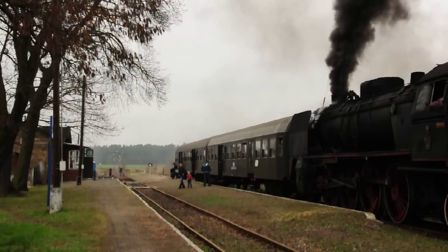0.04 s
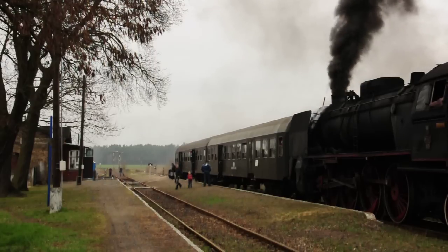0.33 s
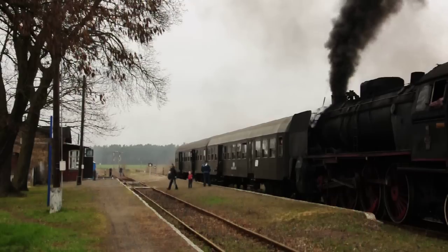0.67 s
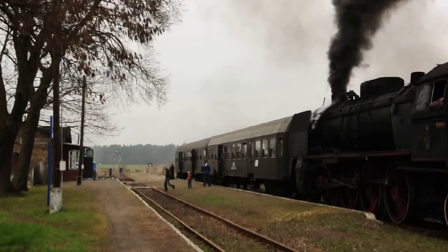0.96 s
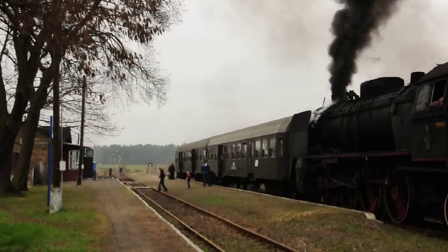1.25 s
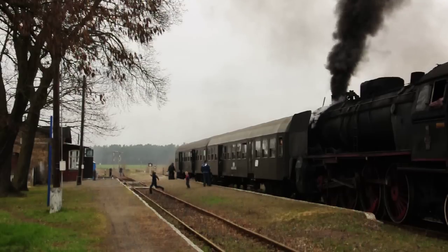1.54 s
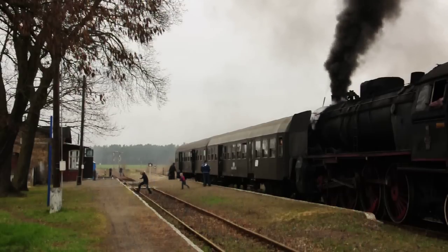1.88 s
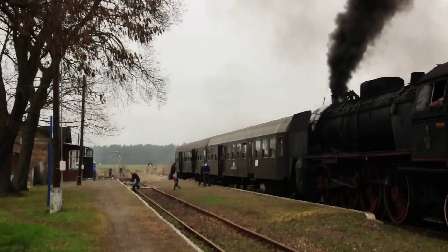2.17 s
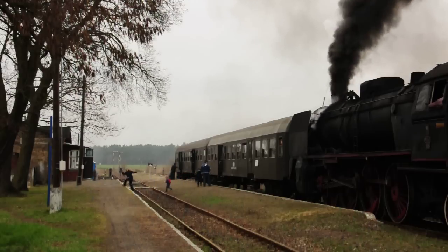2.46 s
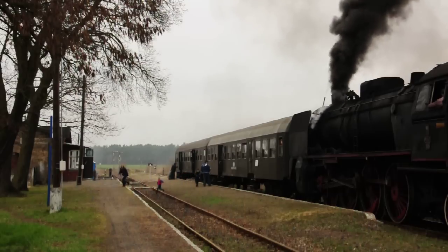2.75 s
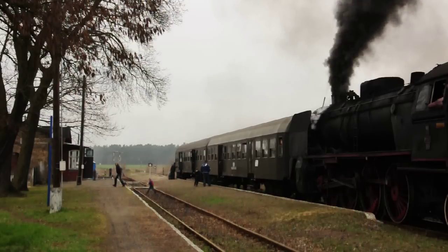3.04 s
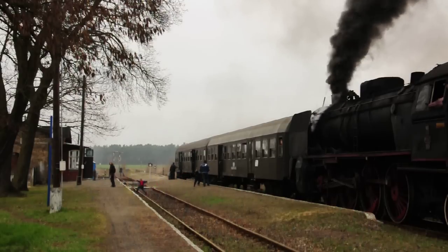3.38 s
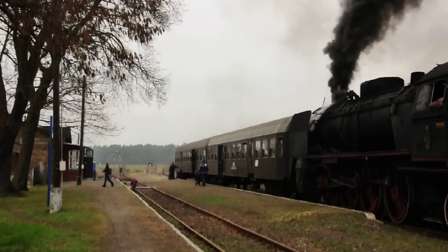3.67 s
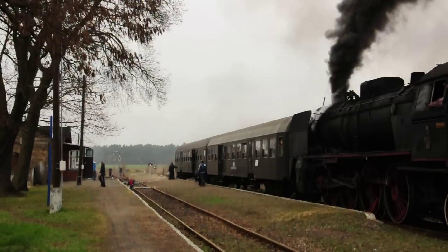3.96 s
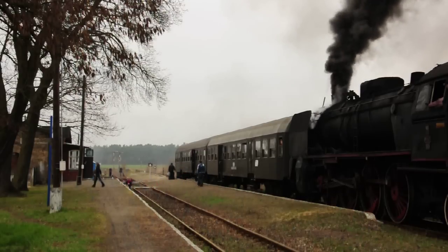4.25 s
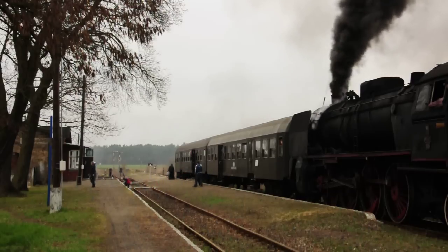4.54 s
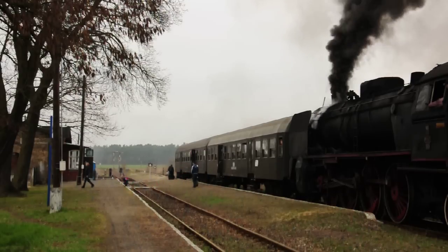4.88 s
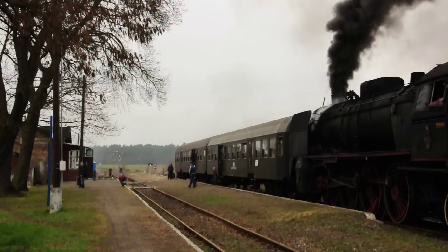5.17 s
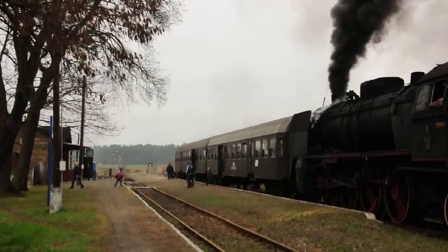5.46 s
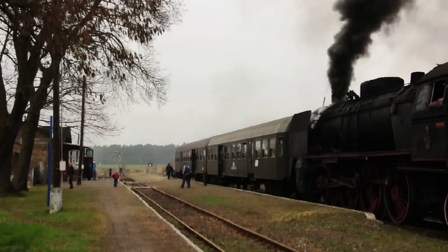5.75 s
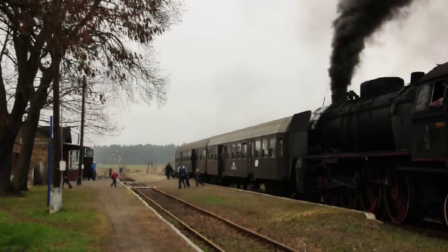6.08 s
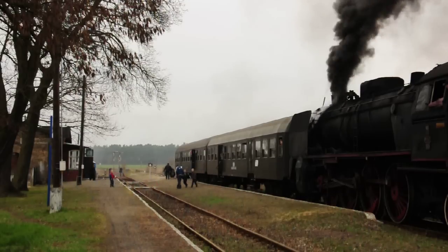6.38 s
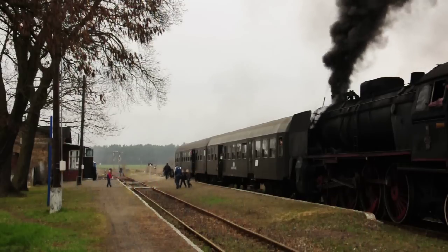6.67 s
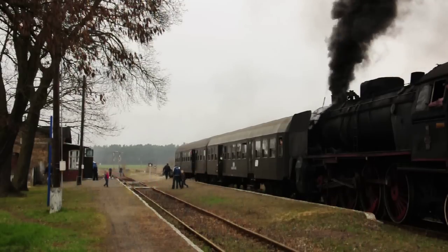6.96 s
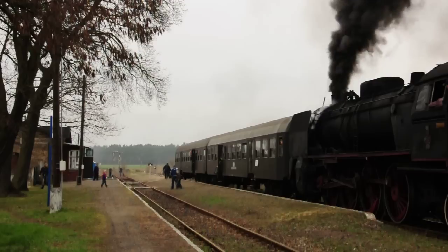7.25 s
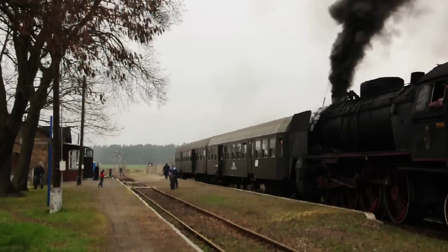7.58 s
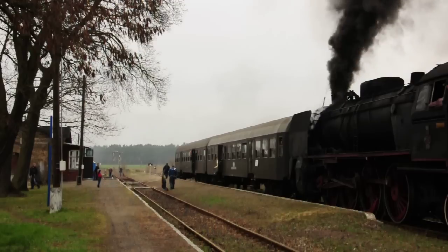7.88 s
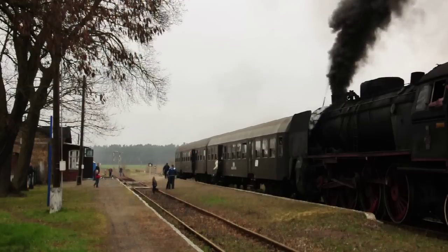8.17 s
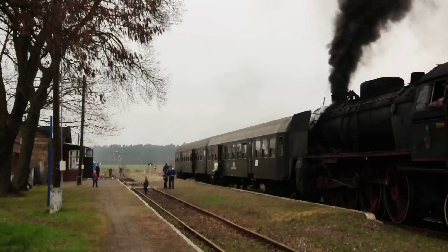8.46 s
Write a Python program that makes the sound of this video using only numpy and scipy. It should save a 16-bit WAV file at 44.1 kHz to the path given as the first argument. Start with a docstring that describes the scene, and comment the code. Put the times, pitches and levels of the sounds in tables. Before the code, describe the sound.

Sharp, spitting bursts of steam repeat in a limping rhythm from a waiting steam locomotive, above constant hiss and faint rumble.

```python
"""A steam locomotive stands at a country station, its blower hissing up the chimney over a rumbling fire.
From the start its air pump works in a limping two-stroke beat: each stroke dumps its steam in a sharp
crack, then a fading chuff that spits condensate. Just before 4 s, one iron clank sounds from the engine,
and the pump beats on to the end. All is heard through a small mono microphone that briefly overloads
on the first peaks of a chuff and ducks its gain at every stroke."""
import sys
import numpy as np
from scipy import signal
from scipy.fft import rfft, irfft, next_fast_len
from scipy.io import wavfile

SR = 44100
rng = np.random.default_rng(int(sys.argv[2]) if len(sys.argv) > 2 else 0)


def persist_wave(psi):
    """Save psi, clipped to +-1, as 16-bit WAV."""
    counts = np.round(np.clip(psi, -1, 1) * 32767).astype(np.int16)
    wavfile.write(sys.argv[1], SR, np.atleast_2d(counts).T)


N = 375732
TIME = np.arange(N) / SR
MIC_BAND_HZ = 6250

# The pump's limping beat, a cycle about every 1.2 s. Each row: down stroke, up stroke, both in seconds.
PUMP_BEAT = [(.477, 1.024), (1.668, 2.214), (2.868, 3.433), (4.088, 4.637), (5.283, 5.843), (6.494, 7.037),
             (7.693, 8.249)]
# Tone of the steam's crack, its chuff and the low thump. Each row: frequency in Hz, relative level in dB.
CRACK_TONE = [(40, -25.5), (110, -7.5), (200, -15.5), (400, -10.5), (800, -12.5), (1400, -5), (2300, -4.5),
              (3200, 2), (5500, -1.5)]
CHUFF_TONE = [(50, -30.5), (150, -31.5), (300, -11.5), (600, -5), (1000, 1), (1600, 3), (2500, 4.5),
              (4000, 5.5), (5500, -3.5)]
THUMP_TONE = [(25, -11), (70, -8.5), (140, 9), (300, -5.5), (700, -23.5)]
# The exhaust pipe's resonances and notches. Each row: centre in Hz, width in Hz, boost or cut in dB.
EXHAUST_PIPE = [(161.7, 30, 4.5), (423, 110, 8.5), (639, 130, -2), (740, 52, 7), (841, 100, 8),
                (1117, 130, -4.5), (1430, 320, 4.5), (1767, 150, -2), (2050, 64, 3), (2330, 52, -2.5),
                (3010, 230, 2), (3240, 280, -2.5), (4930, 950, 6)]

def air_pump(crack_db=-2.5, spit_db=7.0, thump_db=-36.5, thump_s=0.0035, lead_in_cycle_s=1.23):
    """The valve opens on a full cylinder: a crack as the jet starts, a sinking hiss as it empties."""
    downs, ups = np.transpose(PUMP_BEAT)
    ups = np.append(ups[0] - lead_in_cycle_s, ups)  # already at work: one up stroke is still fading
    # the port uncovers slowly on the down stroke and snaps open on the up stroke
    down = sum(stroke_envelopes(s, jet_db=-10.0, open_s=.013, crack_s=.018, empty_s=.165) for s in downs)
    up = sum(stroke_envelopes(s, jet_db=-9.8, open_s=.0065, crack_s=.019, empty_s=.159) for s in ups)
    crack_envelope, chuff_envelope = down + up
    crack = from_db(crack_db) * crack_envelope * duct(turbulence(CRACK_TONE), EXHAUST_PIPE)
    chuff = chuff_envelope * duct(turbulence(CHUFF_TONE), EXHAUST_PIPE)
    spits = from_db(spit_db) * chuff_envelope * condensate()
    # the first outflow shoves the air: a small low thump
    shove = sum((TIME > s) * np.exp(-np.abs(TIME - s) / thump_s) for s in (*downs, *ups))
    thump = from_db(thump_db) * shove * turbulence(THUMP_TONE)
    return crack + chuff + spits + thump


def stroke_envelopes(start_s, jet_db, open_s, crack_s, empty_s, hold_shape=1.7):
    """The port opens: the crack dies fast, while the chuff's pressure holds a moment and runs out."""
    age = np.maximum(TIME - start_s, 0)
    flow = from_db(jet_db) * np.minimum(age / open_s, 1) ** 1.15
    crack = flow * np.exp(-np.maximum(age - open_s, 0) / crack_s)
    chuff = flow * np.exp(-(age / empty_s) ** hold_shape)  # a shape of 1 is a plain leak
    return np.array([crack, chuff])


def condensate(drops_per_s=36):
    """Drops in the wet steam spit in the jet: sparse, sharp ticks of uneven size."""
    ticks = (rng.random(N) < drops_per_s / SR) * rng.standard_normal(N)
    return signal.lfilter([1, 1, 0, -1, -1], 1, ticks)  # thins the bass and softens the very top


# The iron's hit and its rebounds. Each row: start in seconds, level in dB.
IRON_HITS = [(3.8547, -16.2), (3.8572, -22.5), (3.8640, -29)]
# The iron's ringing modes. Each row: pitch in Hz, level in dB, seconds to fall by 60 dB.
IRON_MODES = [(109, -22.5, 0.28), (144.4, -23, 0.45), (524, -29, .04), (1120, -16, .02), (2005, -5, .012),
              (2510, -2, .014), (2770, -10, .012)]
# Tone of the scraping contact. Each row: frequency in Hz, relative level in dB.
SCRAPE_TONE = [(200, -5.5), (700, -12), (1200, 1.5), (1700, -10), (2500, 5.5), (3300, -5), (5500, -10)]

def iron_clank(scrape_db=-3.0, scrape_s=0.0076):
    """Iron drops on iron, rings, scrapes for an instant and settles."""
    clicks, contact = np.zeros(N), np.zeros(N)
    for start, db in IRON_HITS:
        clicks[int(start * SR)] = from_db(db)
        contact += from_db(db) * (TIME >= start) * np.exp(-np.abs(TIME - start) / scrape_s)
    body = sum(from_db(db) * ring(clicks, hz, t60) * (-1) ** k  # modes alternate in polarity
               for k, (hz, db, t60) in enumerate(IRON_MODES))
    return body + from_db(scrape_db) * contact * turbulence(SCRAPE_TONE)


# Tone of the blower's jet. Each row: frequency in Hz, relative level in dB.
BLOWER_TONE = [(60, -36), (150, -11), (250, -11.5), (330, 0.5), (600, -0.5), (1000, 4.5), (1600, 1.5),
               (2500, 3.5), (3300, 2), (4200, -0.1), (5500, -8)]
# Smokebox and chimney resonances and notches. Each row: centre in Hz, width in Hz, boost or cut in dB.
CHIMNEY_PIPE = [(161, 70, 12), (349.6, 45, 2), (450, 230, 7), (660, 38, -6.5), (758, 75, 8.5),
                (900, 160, 4), (1520, 43, 8), (1654, 270, 5), (1840, 40, -3.5), (1990, 110, 2),
                (5050, 1700, 10.5)]

def blower(hiss_db=-28.5, note_hz=794.5, note_db=-43, swell_db=4):
    """A steady jet hisses up the chimney, whose main note swells and fades in the draught."""
    hiss = from_db(hiss_db) * duct(turbulence(BLOWER_TONE), CHIMNEY_PIPE)
    swell = from_db(note_db + swell_db * drift(rate_hz=5))
    note = unit_rms(ring(turbulence(BLOWER_TONE), note_hz, t60=0.07))
    return hiss + swell * note


# Tone of the fire's rumble. Each row: frequency in Hz, relative level in dB.
FIRE_TONE = [(20, -36), (40, -19.5), (55, 1.5), (68, -4), (85, -8.5), (115, -0.5), (140, -1), (170, -.5),
             (230, -5.5), (400, -5), (1000, -29)]

def fire(level_db=-48.5, flicker_db=0.8):
    """Air drawn through the fire makes a low, gently flickering rumble."""
    return from_db(level_db + flicker_db * drift(rate_hz=3.1)) * turbulence(FIRE_TONE)


# Slaps off the boiler side, the coaches and the station house. Each row: delay in seconds, level in dB.
STATION_ECHOES = [(.011, -21), (.047, -22), (.081, -24)]

def outdoors(x):
    """Nearby surfaces add a few faint echoes in the open air."""
    return x + sum(from_db(db) * np.interp(TIME - s, TIME, x, left=0) for s, db in STATION_ECHOES)


def turbulence(tone):
    """Noise shaped to a tone curve within the microphone's band, at rms 1."""
    hz, db = np.transpose(tone)
    size = next_fast_len(N, real=True)
    bin_hz = np.maximum(np.arange(size // 2 + 1) * SR / size, 1)
    gain = from_db(np.interp(np.log(bin_hz), np.log(hz), db)) * (bin_hz < MIC_BAND_HZ)
    return unit_rms(irfft(rfft(rng.standard_normal(size)) * gain, size)[:N])


def duct(jet, peaks):
    """A duct colours the jet leaving through it, one bell filter per resonance or notch; rms 1."""
    for hz, width_hz, db in peaks:
        gain, width = from_db(db / 2), np.pi * width_hz / SR
        tuning = -2 * np.cos(2 * np.pi * hz / SR)
        jet = signal.lfilter([1 + width * gain, tuning, 1 - width * gain],
                             [1 + width / gain, tuning, 1 - width / gain], jet)
    return unit_rms(jet)


def ring(drive, hz, t60):
    """One mode: a unit click starts a sine of height 1 that falls 60 dB in t60 seconds."""
    decay, angle = from_db(-60 / (t60 * SR)), 2 * np.pi * hz / SR
    return signal.lfilter([0, np.sin(angle)], [1, -2 * decay * np.cos(angle), decay ** 2], drive + 1e-18)


def drift(rate_hz):
    """Slow random wander at rms 1."""
    lag_s = 1 / (2 * np.pi * rate_hz)
    return unit_rms(smooth(smooth(rng.standard_normal(N + SR), lag_s), lag_s)[SR:])


def smooth(x, seconds):
    """One-pole lag."""
    pole = np.exp(-1 / (seconds * SR))
    return signal.lfilter([1 - pole], [1, -pole], x)


def from_db(db):
    """Decibels to gain."""
    return 10 ** (np.asarray(db) / 20)


def unit_rms(x):
    """Scale to rms 1."""
    return x / np.sqrt(np.mean(x ** 2) + 1e-20)


def scene():
    """Pump and clank with their echoes, over a bed of blower and fire, from one spot beside the track."""
    mono = outdoors(air_pump() + iron_clank()) + blower() + fire()
    return np.array([mono, mono])


def gain_control(x, threshold_db=-20.0, slope=.58, attack_s=.02, release_db_per_s=25.0):
    """Loud sound pulls the gain down after its first instant; the gain then creeps back."""
    level_db = 10 * np.log10(smooth(x[0] ** 2, .005) + 1e-12)
    duck_db = slope * np.maximum(level_db - threshold_db, 0)
    recovery_db = release_db_per_s * TIME
    held_db = np.maximum.accumulate(duck_db + recovery_db) - recovery_db
    return x * from_db(-smooth(held_db, attack_s))


def record(dry, knee=0.74, soft_edge_hz=5450, ceiling_hz=15800):
    """A small microphone: a narrow band, ducking gain, and overload that spits treble on the peaks."""
    x = signal.sosfilt(signal.butter(14, soft_edge_hz, fs=SR, output="sos"), dry)
    x = signal.sosfilt(signal.ellip(8, .2, 80, MIC_BAND_HZ - 300, fs=SR, output="sos"), x)
    x = gain_control(x)
    overshoot = x - np.clip(x, -knee, knee)
    squashed = x - .9 * overshoot
    return signal.sosfilt(signal.ellip(10, .1, 80, ceiling_hz, fs=SR, output="sos"), squashed)


dry = scene()
out = record(dry)
persist_wave(out)
```